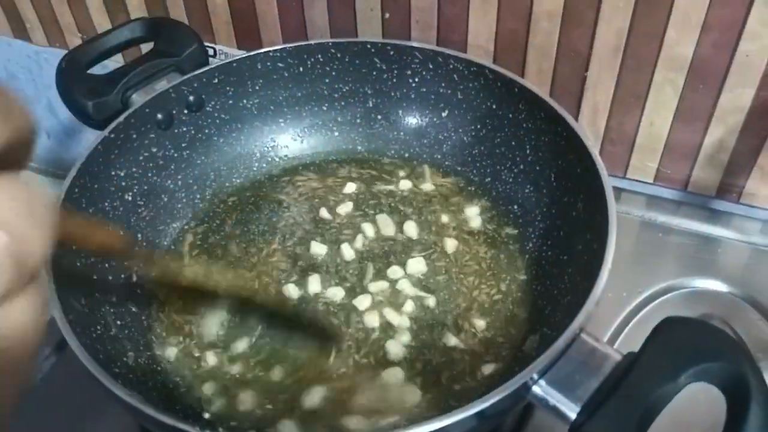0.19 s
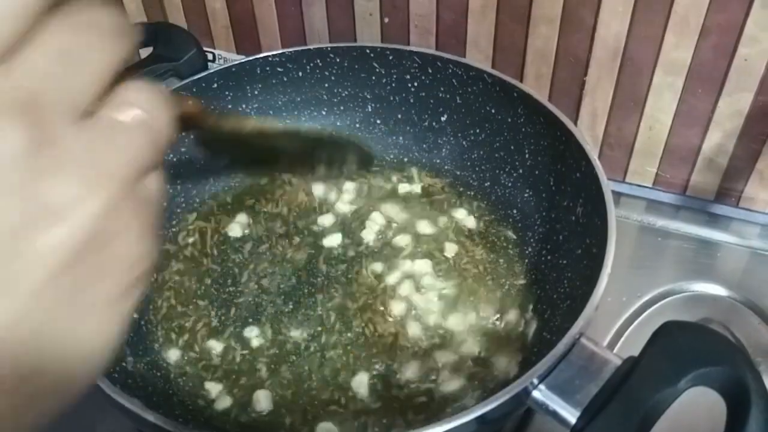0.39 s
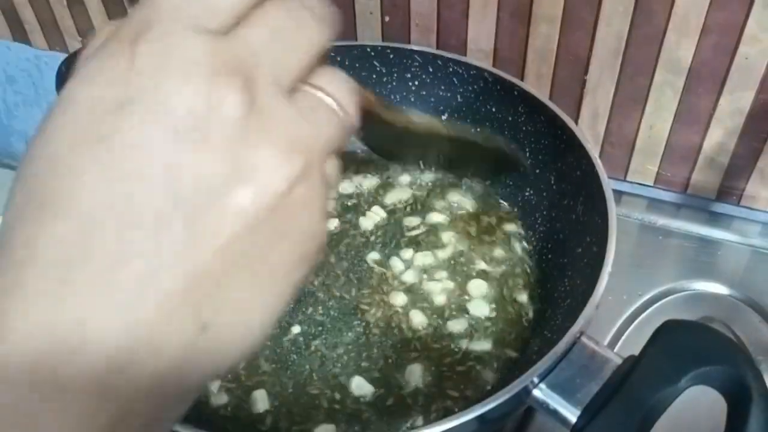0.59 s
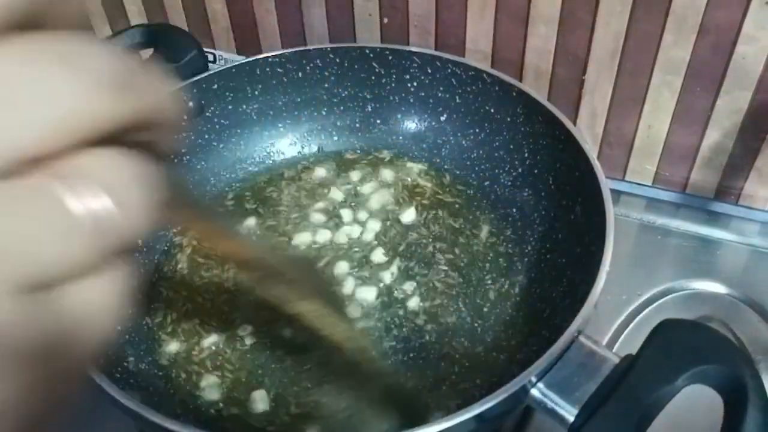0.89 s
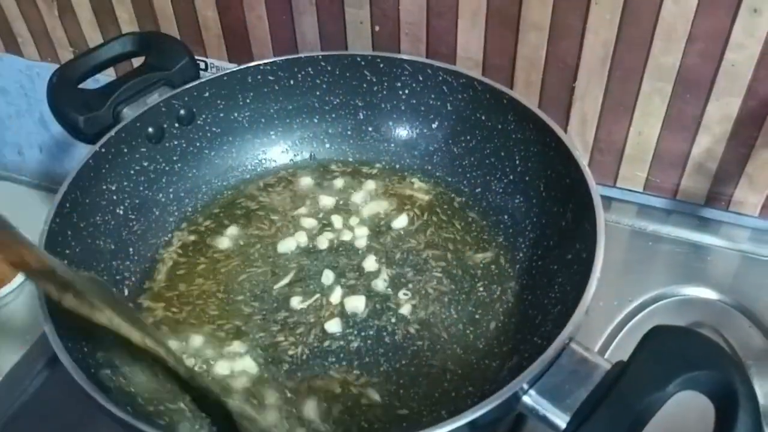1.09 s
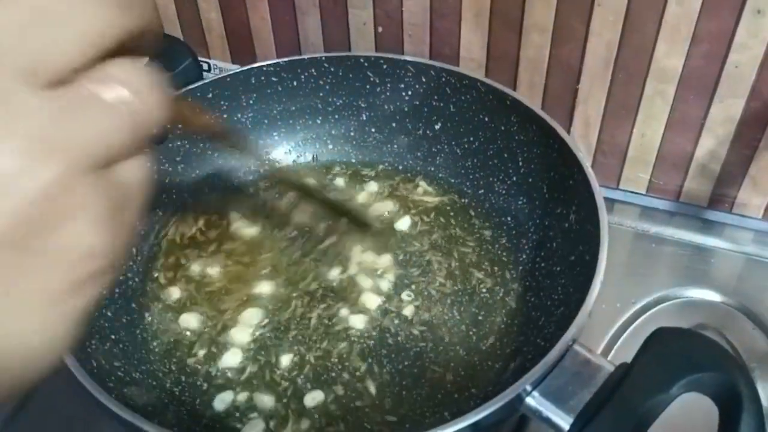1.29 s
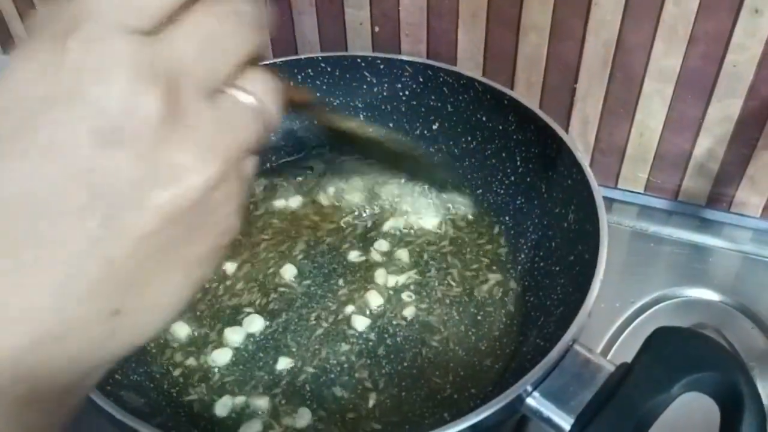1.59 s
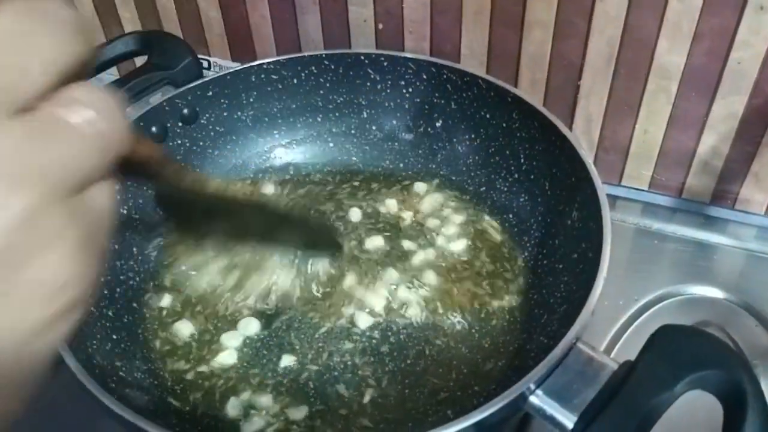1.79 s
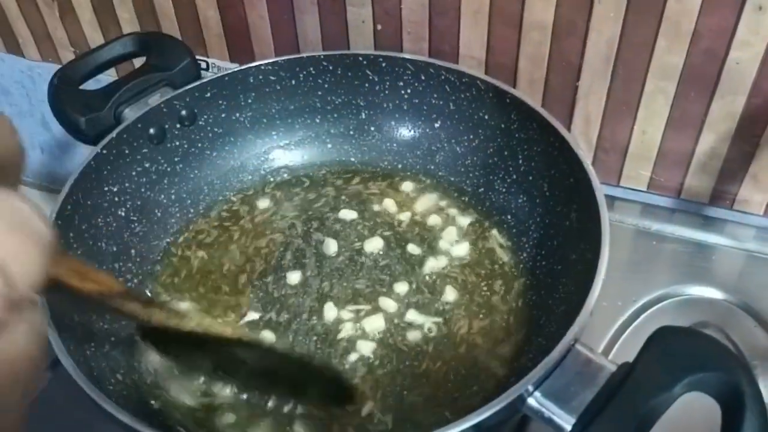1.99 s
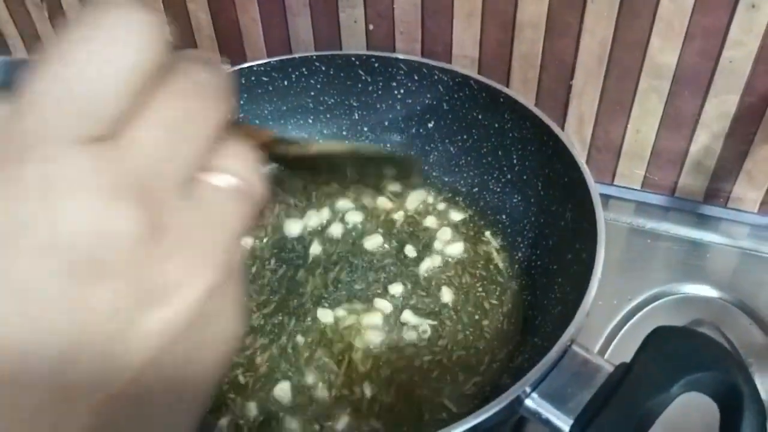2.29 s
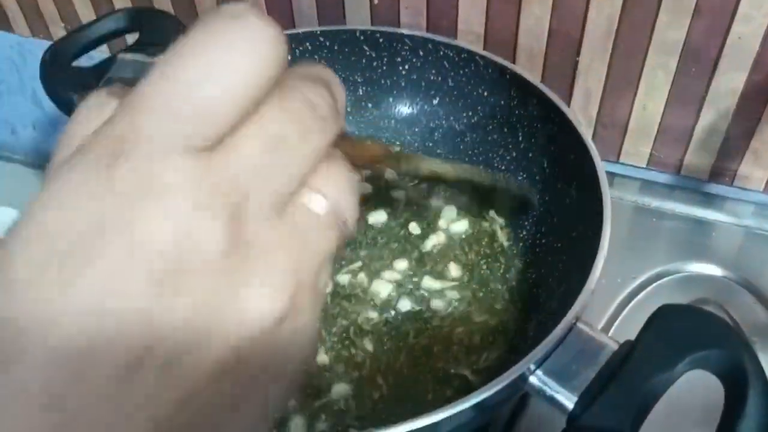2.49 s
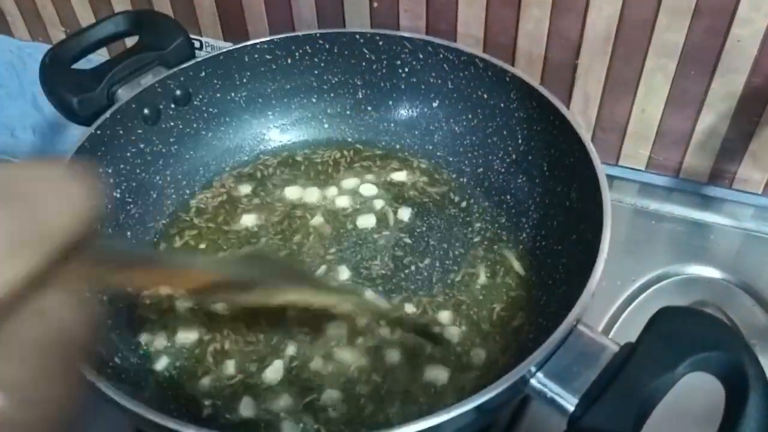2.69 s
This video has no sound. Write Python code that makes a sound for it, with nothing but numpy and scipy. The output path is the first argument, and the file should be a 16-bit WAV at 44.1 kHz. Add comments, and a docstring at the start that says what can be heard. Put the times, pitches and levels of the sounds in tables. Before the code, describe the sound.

Steady, bright sizzle of garlic in hot oil for about 2.8 seconds, close and mono in a small kitchen. A spatula scrapes and taps at 0.25, scrapes at 0.6 and 1.2, knocks the pan clearly at 1.55, and brushes softly at 2.5. Sharp spits scatter from 0.3 to 1.6 and at 2.2. Low microphone thuds come at 0.4, 0.8-0.95, faintly at 1.15 and 2.47, with intermittent rumble.

```python
"""Garlic and seeds in hot oil

Close up over a pan of shallow oil in a small kitchen, the same sound in both channels.
Random clicks of tiny steam bubbles over hiss make the sizzle; filtered bursts make wet pieces spit and spurt.
A wooden spatula knocks the pan's ringing modes and scrapes them with stick-slip clicks.
Sagging low tones thud as handling bumps on the microphone, over a rumble that comes and goes."""
import sys
import numpy as np
from scipy import signal
from scipy.fft import rfft, irfft
from scipy.io import wavfile
from scipy.ndimage import uniform_filter1d

SR = 44100
rng = np.random.default_rng(int(sys.argv[2]) if len(sys.argv) > 2 else 0)


def digitize_waveform(pressure):
    """Quantize a signal to 16-bit integers and store it at the path in sys.argv[1].

    Rows of a 2-D input are taken as channels; values are limited to [-1, 1].
    """
    field = np.atleast_2d(pressure).T
    bounded = np.clip(field, -1, 1)
    quanta = np.round(bounded * 32767).astype(np.int16)
    wavfile.write(sys.argv[1], SR, quanta)


N = 125685
T = np.arange(N) / SR


def undb(db):
    """Decibels to gain."""
    return 10 ** (np.asarray(db) / 20)


def unit(x):
    """Scale to rms 1."""
    return x / np.sqrt(np.mean(x ** 2) + 1e-30)


def crest(x, db, size=441):
    """Scale so that the loudest short stretch (size in samples) has this rms level."""
    return x * undb(db) / np.sqrt(uniform_filter1d(x ** 2, size).max() + 1e-30)


def noise():
    """White noise."""
    return rng.standard_normal(N)


def band(x, hz, width_hz):
    """One resonance."""
    hz = min(hz, .45 * SR)
    return signal.lfilter(*signal.iirpeak(hz, hz / width_hz, fs=SR), x)


def cut(x, hz, kind, order=2):
    """Low-pass or high-pass."""
    return signal.sosfilt(signal.butter(order, hz, kind, fs=SR, output="sos"), x)


def ring(x, response):
    """Pass a sound through an impulse response."""
    return signal.fftconvolve(x, response)[:N]


def place(x, s):
    """Delay a sound to start at s seconds."""
    return np.concatenate([np.zeros(max(int(s * SR), 0)), x])[:N]


def decay(t60_s):
    """Exponential decay by 60 dB in t60_s."""
    return np.exp(-np.log(1000) * T / t60_s)


def swell(s, rise_s, fall_s):
    """Exponential rise to a crest at s, then exponential fall."""
    return np.exp(-np.maximum((s - T) / rise_s, (T - s) / fall_s))


def clicks(per_s, spread_db):
    """Random clicks of either sign, many weak and a few strong."""
    size = undb(spread_db * np.minimum(rng.exponential(size=N), 2 * np.pi))
    happens = rng.random(N) < per_s / SR
    return unit(happens * size * np.sign(noise()))


def walk(per_s):
    """Random drift: straight lines between normal random knots, per_s of them each second."""
    knots = rng.standard_normal(1024)
    return np.interp(T * per_s, np.arange(len(knots)), knots)


BOWL_ECHO_DB, BOWL_ECHO_S = -7.5, 0.0085  # total echo gain, decay time constant


def bowl(x):
    """Quick reflections between the walls of the pan and the backsplash."""
    echoes = place(clicks(2500, 1) * np.exp(-T / BOWL_ECHO_S), .001)
    echoes = echoes / np.sqrt(np.sum(echoes ** 2) + 1e-30)
    return x + undb(BOWL_ECHO_DB) * ring(x, echoes)


# colour of the sizzle as heard close over the oil: (frequency [Hz], relative gain [dB])
SIZZLE_COLOUR = [(300, -32.5), (620, -35), (820, -24.5), (980, -37.5), (1200, -15.5), (1390, -3),
                 (1620, -11.5), (2050, -5.5), (2300, -5.5), (3500, -3.5), (4850, -5), (5300, -2.5),
                 (5900, -1), (6600, 1.5), (7400, -0.5), (8100, -6.5), (9500, -4), (11000, -7.5)]
# slow rise and fall of the frying, added to SIZZLE_DB: (time [s], relative level [dB])
SIZZLE_SWELL = [(0, 2.5), (.45, 2.35), (.9, 2.5), (1.25, 2.5), (1.7, 1.74), (2.1, 2.5), (2.42, 0.5),
                (2.55, 2), (2.85, 2)]
SIZZLE_DB, FLICKER_DB = -45.5, .4
BUBBLES_PER_S, BUBBLE_SPREAD_DB = 5000, 2
HISS_DB = 2.5  # relative to the bubbles


def sizzle():
    """Bursting micro-bubbles over a fine hiss, reflected in the bowl of the pan and coloured."""
    bubbles = clicks(BUBBLES_PER_S, BUBBLE_SPREAD_DB)
    frying = bowl(bubbles + undb(HISS_DB) * noise())
    hz, db = np.array(SIZZLE_COLOUR).T
    f = np.maximum(np.fft.rfftfreq(N, 1 / SR), 1)
    colour = undb(np.interp(np.log(f), np.log(hz), db))
    coloured = irfft(rfft(frying) * colour, N)
    slow_db = np.interp(T, *np.array(SIZZLE_SWELL).T)
    return unit(coloured) * undb(SIZZLE_DB + slow_db + FLICKER_DB * walk(35))


# low rumble of stirring at the microphone, before the high-pass: (time [s], level [dB])
RUMBLE_LEVEL = [(0, -53), (.1, -70), (.18, -85), (.24, -59), (.29, -48), (.34, -60), (.38, -38.5),
                (.44, -50.5), (.62, -48.5), (.74, -51), (.84, -36), (.96, -50.5), (1.07, -59.5),
                (1.15, -38.5), (1.31, -47.5), (1.43, -97), (1.53, -54), (1.6, -43), (1.86, -83.5),
                (2.1, -83.5), (2.16, -69), (2.24, -78.5), (2.4, -69), (2.51, -39.5), (2.62, -60),
                (2.8, -83)]
RUMBLE_HZ, RUMBLE_WIDTH_HZ = 92, 91


def rumble():
    """Noise through two equal low resonances, swelling and fading with the stirring."""
    low = band(noise(), RUMBLE_HZ, RUMBLE_WIDTH_HZ)
    low = unit(band(low, RUMBLE_HZ, RUMBLE_WIDTH_HZ))
    return cut(low * undb(np.interp(T, *np.array(RUMBLE_LEVEL).T)), 45, "high")


# ringing modes of the pan on its stand: (frequency [Hz], relative level [dB], 60 dB decay time [s])
PAN_MODES = [(140, 2, 0.32), (175.7, 0, .2), (247.1, -3.5, 0.32), (410, -11, 0.36), (491.3, -8.5, 0.26),
             (557, 4.5, 0.063), (597, 4.5, 0.064), (641.3, -2, 0.11), (745.6, -0.5, 0.17), (802.5, 0, .17),
             (884.3, 1.5, .14), (934, -5.5, 0.081), (1194, -12.5, .07), (1392, -8.5, 0.22)]
CONTACT_S = 0.0011  # build-up time constant of the modes
CLATTER_DB, CLATTER_S = -11, 0.016  # relative to the modes; decay time constant
STAND_DB, STAND_T60_S = -7.5, 0.27  # relative to the modes


def pan_response():
    """The pan's modes build up during contact, with a brief clatter and the dense, dull ring of its stand."""
    modes = 0
    for hz, db, t60 in PAN_MODES:
        modes = modes + undb(db) * np.sin(2 * np.pi * hz * T) * decay(t60)
    modes = modes * (1 - np.exp(-T / CONTACT_S))
    clatter = cut(cut(noise(), 1770, "low", order=6), 190, "high") * np.exp(-T / CLATTER_S)
    stand = cut(cut(noise(), 850, "low", order=4), 250, "high") * decay(STAND_T60_S)
    return unit(modes) + undb(CLATTER_DB) * unit(clatter) + undb(STAND_DB) * unit(stand)


# spatula strokes across the pan, level before the low-pass and the room:
# (crest time [s], rise [s], fall [s], level [dB], chatter pitch at the crest [Hz], width [Hz],
# glide [octaves/s])
STROKES = [(0.247, 0.01, 0.011, -37, 776, 266, -9.5), (0.248, 0.0052, 0.0027, -44.5, 1380, 250, 0),
           (0.572, 0.0069, 0.042, -36.5, 268.4, 35, -0.5), (.688, 0.0096, 0.016, -37.5, 193.5, 118, -2),
           (.68, 0.061, 0.023, -52, 586, 500, 2.5), (0.852, 0.11, 0.029, -50, 590, 360, 3),
           (1.165, 0.0079, .013, -46, 750, 130, 20), (1.199, .016, 0.017, -46, 430, 360, -2),
           (1.229, 0.015, 0.027, -51.5, 870, 248, 1), (1.214, .025, 0.012, -46.5, 1450, 117, 0),
           (1.242, 0.03, 0.021, -33.5, 188.7, 50, -2), (2.504, 0.0026, 0.021, -44, 614, 260, 2.5),
           (2.541, 0.015, 0.03, -41.5, 263, 80, 2)]
SLIPS_PER_S, SLIP_SPREAD_DB = 680, 1.97
WOOD_DB = -1  # relative to the pan


def scrapes(pan):
    """The spatula sticks and slips on the oiled pan, sounding its own wood and the pan at a gliding pitch."""
    out = 0
    for s, rise, fall, db, hz, width, glide in STROKES:
        pitch = hz * 2 ** np.clip(glide * (T - s), -1, .5)
        turn = np.exp(2j * np.pi * np.cumsum(pitch) / SR)
        # shift the clicks down by the pitch, low-pass, shift back: a band that follows the glide
        shifted = cut(clicks(SLIPS_PER_S, SLIP_SPREAD_DB) / turn, width / 2, "low")
        slips = (shifted * turn).real * swell(s, rise, fall)
        stroke = unit(ring(slips, pan)) + undb(WOOD_DB) * unit(slips)
        out = out + crest(stroke, db)
    return cut(out, 1900, "low", order=4)


# spatula knocks on the pan, level before the room:
# (time [s], level [dB], brightness as a low-pass corner, lower for softer contact [Hz])
SPATULA_KNOCKS = [(.247, -39, 1120), (0.258, -37.5, 198), (1.5503, -25, 1270), (1.5606, -37, 1020),
                  (1.5792, -28.5, 199), (2.498, -47, 670), (2.529, -41.5, 288)]


def knocks(pan):
    """Wood strikes the pan; softer contact leaves only the low modes."""
    out = 0
    for s, db, hz in SPATULA_KNOCKS:
        knock = cut(cut(pan, hz, "low", order=4), 108, "high", order=3)
        out = out + place(crest(knock, db), s)
    return out


# spurts of steam from turned pieces, level before the high-pass and the room:
# (crest time [s], rise [s], fall [s], level [dB], pitch [Hz], width [Hz])
STEAM_SPURTS = [(0.337, .009, 0.0047, -36, 5800, 620), (.629, 0.012, .012, -37, 4300, 700),
                (0.709, 0.0056, 0.0061, -40, 5400, 2505), (1.227, 0.029, .03, -47, 3800, 2560),
                (1.41, 0.0092, .015, -47.5, 4400, 1460), (1.512, 0.0091, 0.006, -46.5, 5800, 2500),
                (2.157, .015, 0.014, -45, 3600, 2450), (2.197, 0.038, 0.01, -50.5, 7900, 3020),
                (2.238, 0.011, 0.0072, -40, 6300, 1830), (2.251, 0.0042, 0.012, -38.5, 5940, 2020),
                (2.255, 0.0074, 0.0067, -40.5, 4660, 628)]


def spurts():
    """Short flurries of bubbles around one pitch."""
    out = 0
    for s, rise, fall, db, hz, width in STEAM_SPURTS:
        bubbles = band(band(clicks(6000, 2.2), hz, width), hz, width)
        out = out + crest(bubbles * swell(s, rise, fall), db)
    return cut(out, 1600, "high", order=3)


# drops of water bursting in the oil, level before the room:
# (time [s], level [dB], pitch [Hz], width [Hz], decay time constant of the crack [s])
WATER_DROPS = [(0.3331, -34, 5780, 490, .005), (0.4242, -33, 3900, 1910, .003),
               (0.612, -34.5, 4000, 1410, .004), (0.7526, -31, 3450, 1600, .004),
               (0.9596, -38.5, 7660, 3560, .005), (1.2006, -41, 3540, 1200, .003),
               (1.391, -39, 4200, 1400, .005), (1.5494, -40.5, 2950, 2500, .004),
               (1.5794, -40.5, 3320, 2010, .005), (2.1885, -36, 6420, 600, 0.0017),
               (2.1934, -35.5, 9600, 1510, .004)]
SPRAY_DB, SPRAY_S = -4, 0.021  # relative to the crack; decay time constant
SPLASH_DB = -12  # broad splash, relative to the pitched part


def spits():
    """Each drop cracks, rings briefly and throws a fine spray."""
    out = 0
    for s, db, hz, width, crack_s in WATER_DROPS:
        burst = noise() * (np.exp(-T / crack_s) + undb(SPRAY_DB) * np.exp(-T / SPRAY_S))
        pop = unit(band(burst, hz, width)) + undb(SPLASH_DB) * unit(band(burst, 6000, 6000))
        out = out + place(crest(cut(pop, 1900, "high", order=3), db), s)
    return out


# dull bumps on the microphone, level before the high-pass:
# (time [s], level [dB], starting pitch [Hz])
MICROPHONE_BUMPS = [(0.3884, -23, 252), (.814, -25, 256), (.845, -20.5, 274), (0.9281, -22.5, 251),
                    (1.134, -37, 118), (1.149, -35.5, 101), (1.257, -46, 129), (1.327, -40, 151),
                    (2.4691, -34, 193)]
BUMP_END_HZ, BUMP_SAG_S, BUMP_SWELL_S = 72, 0.0046, .0024  # final pitch, time constants


def bumps():
    """Soft handling bumps: brief low tones that sag in pitch."""
    push = (T / BUMP_SWELL_S) ** 2 * np.exp(-T / BUMP_SWELL_S)
    out = 0
    for s, db, hz in MICROPHONE_BUMPS:
        pitch = BUMP_END_HZ + (hz - BUMP_END_HZ) * np.exp(-T / BUMP_SAG_S)
        thud = -push * np.sin(2 * np.pi * np.cumsum(pitch) / SR)
        out = out + place(crest(thud, db), s)
    return cut(out, 45, "high")


ROOM_DB, ROOM_T60_S = -10.5, 0.17  # total gain of the reverberation, 60 dB decay time


def kitchen(x):
    """Short reverberation from close walls."""
    tail = place(noise() * decay(ROOM_T60_S), .003)
    return x + undb(ROOM_DB) * ring(x, tail / np.sqrt(np.sum(tail ** 2)))


def scene():
    """Oil, spatula and handling, the same in both channels; only spits, spurts and spatula get the room."""
    pan = pan_response()
    oil = sizzle()
    in_room = kitchen(spits() + spurts() + knocks(pan) + scrapes(pan))
    x = oil + in_room + bumps() + rumble()
    return np.array([x, x])


def record(dry):
    """The recorder cuts the top steeply, above 9620 Hz."""
    return signal.sosfilt(signal.ellip(12, .1, 80, 9620, fs=SR, output="sos"), dry)


dry = scene()
out = record(dry)
digitize_waveform(out)
```